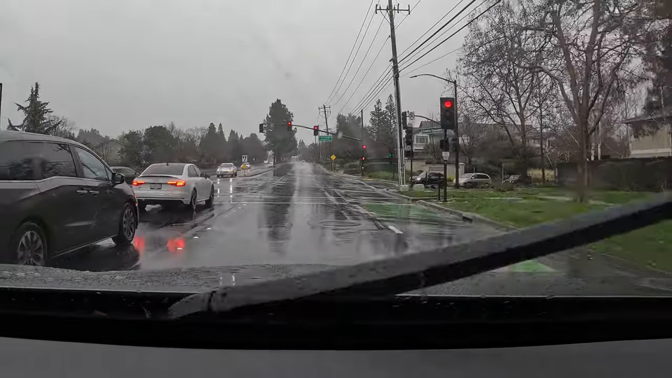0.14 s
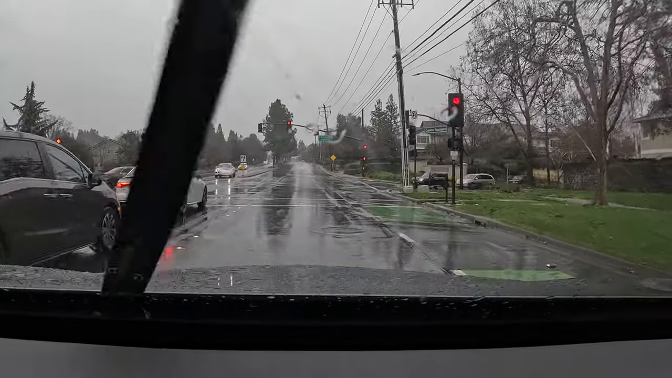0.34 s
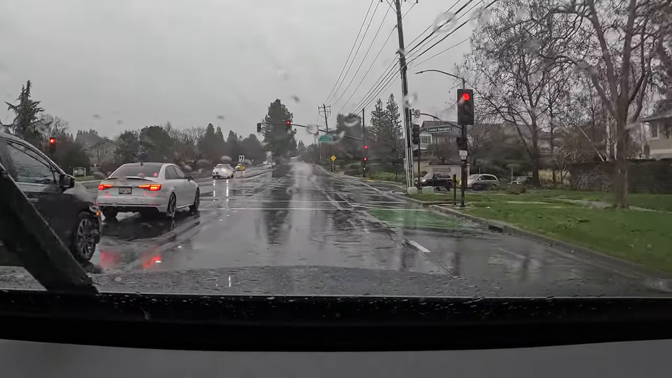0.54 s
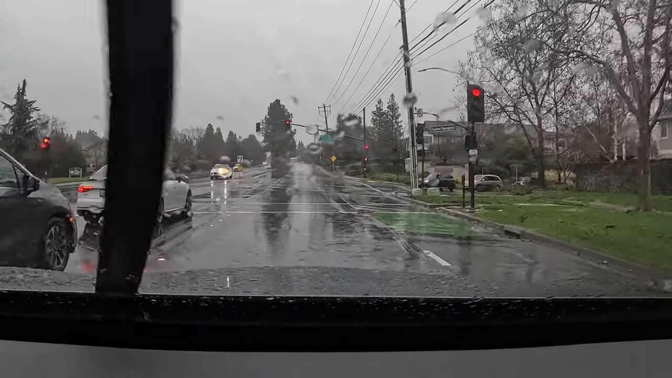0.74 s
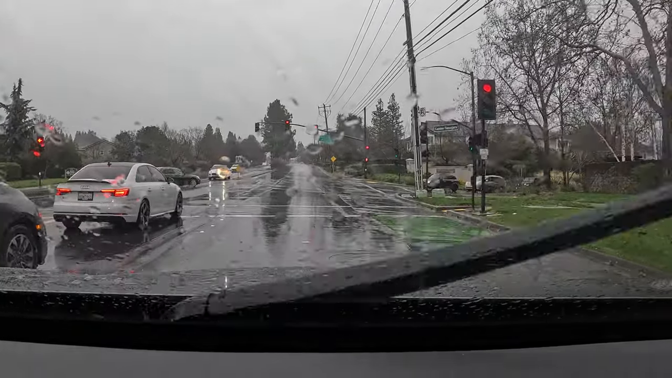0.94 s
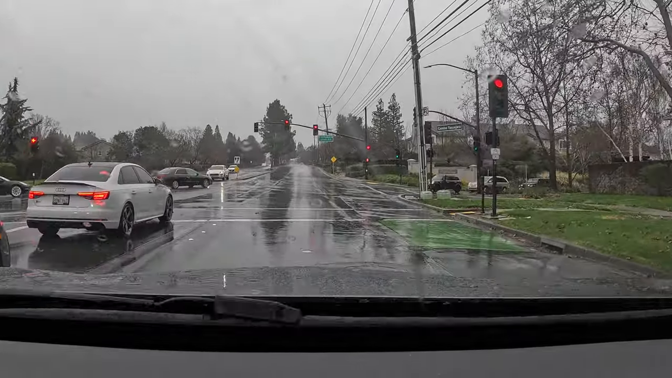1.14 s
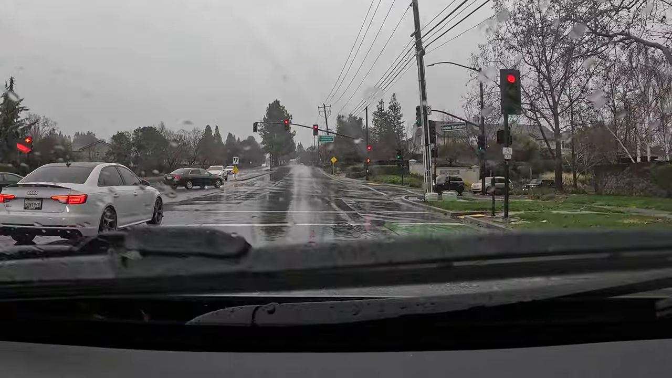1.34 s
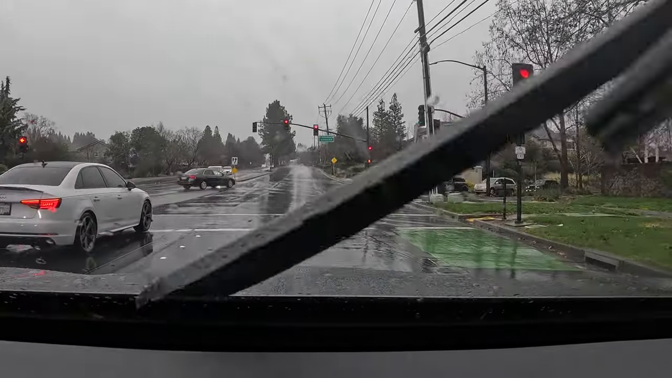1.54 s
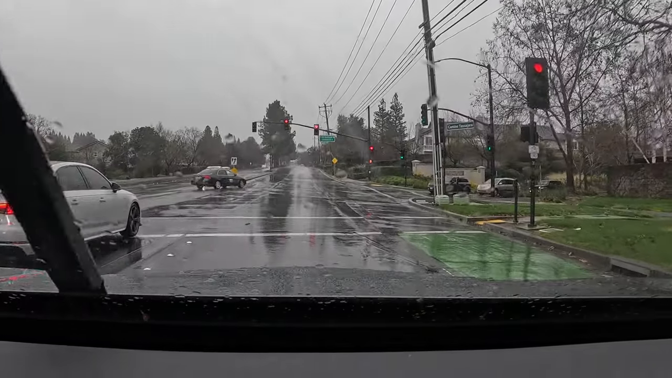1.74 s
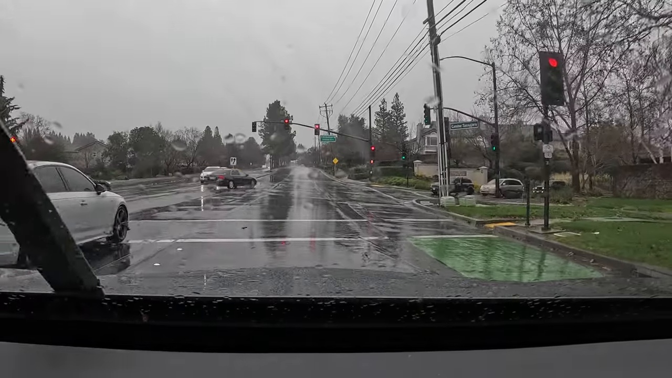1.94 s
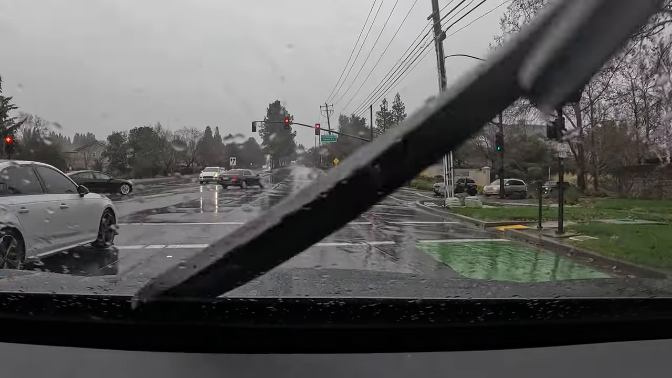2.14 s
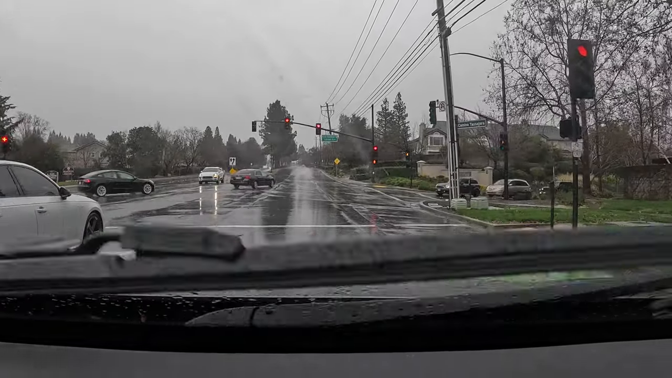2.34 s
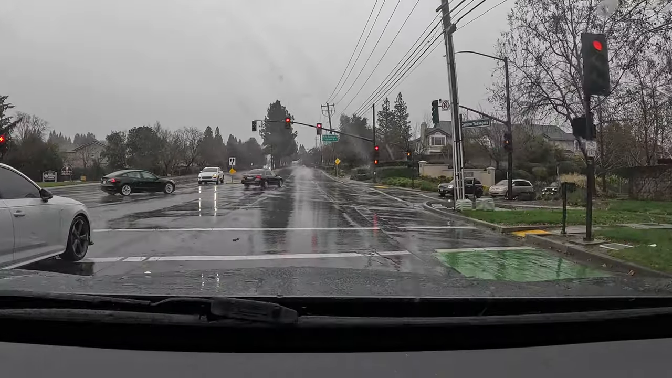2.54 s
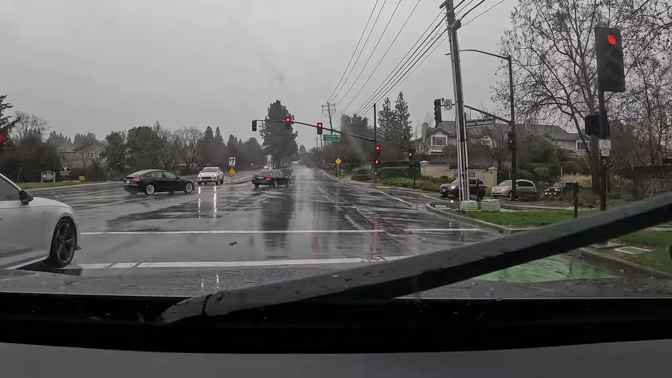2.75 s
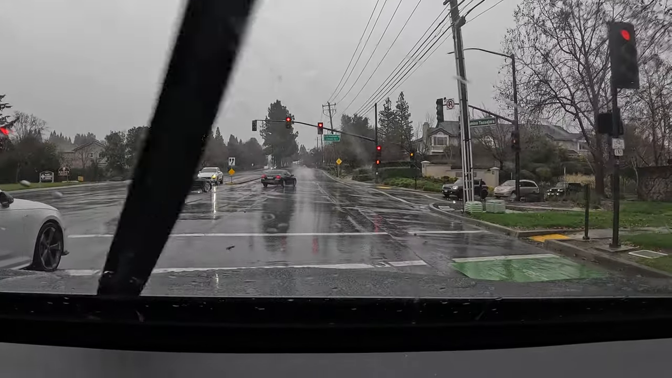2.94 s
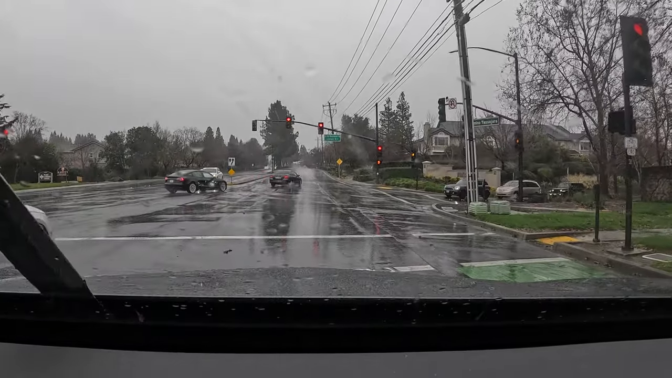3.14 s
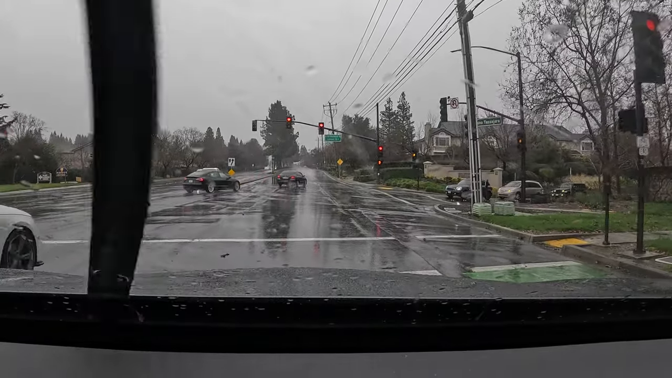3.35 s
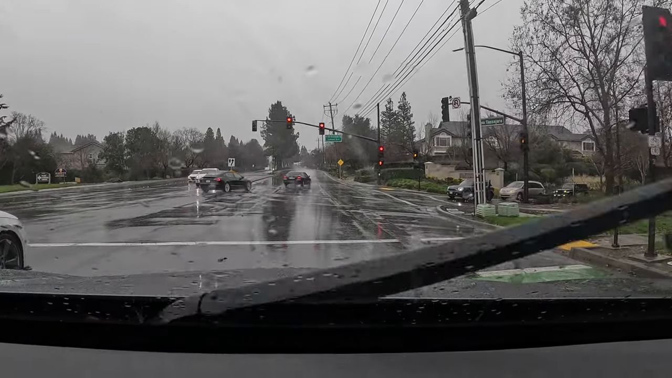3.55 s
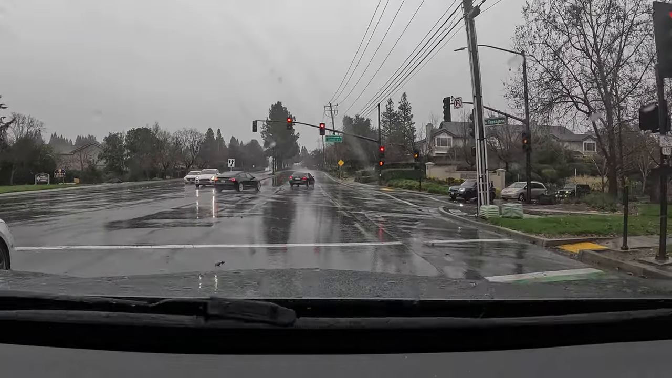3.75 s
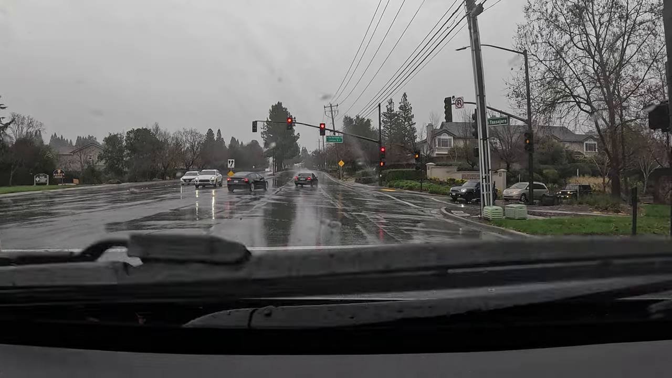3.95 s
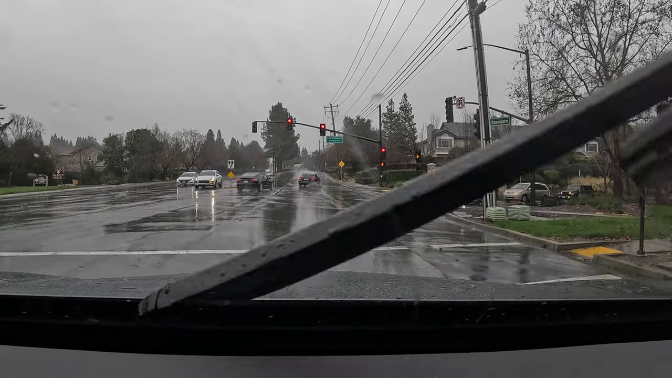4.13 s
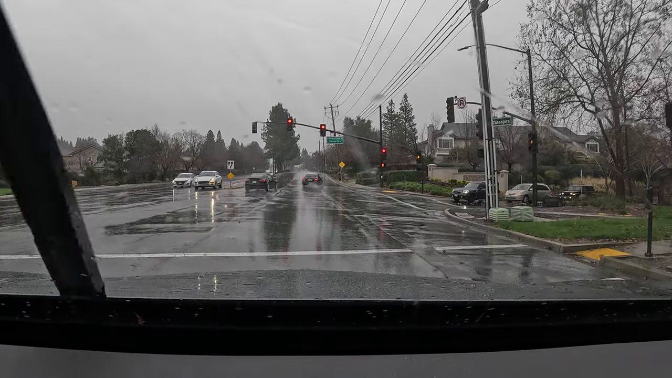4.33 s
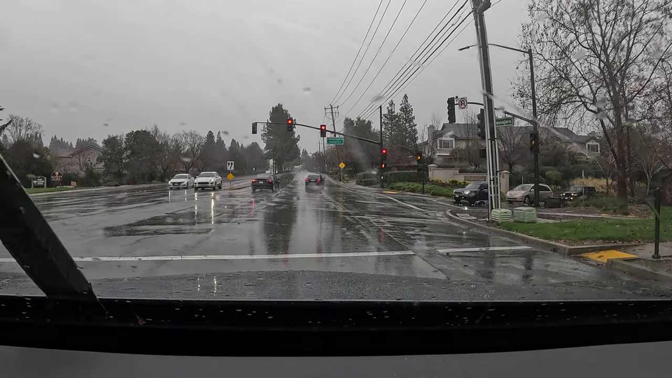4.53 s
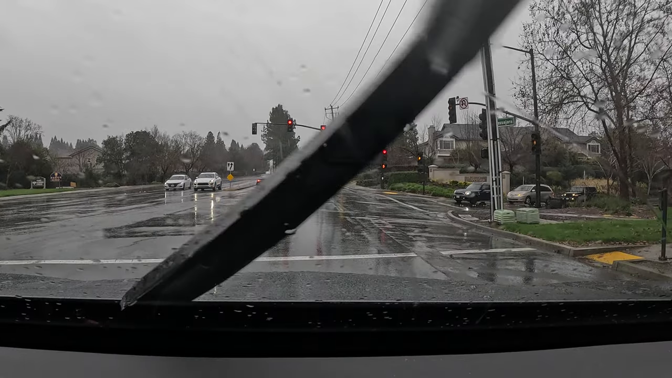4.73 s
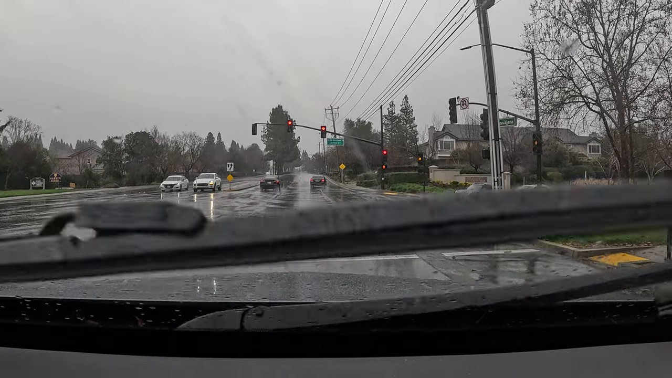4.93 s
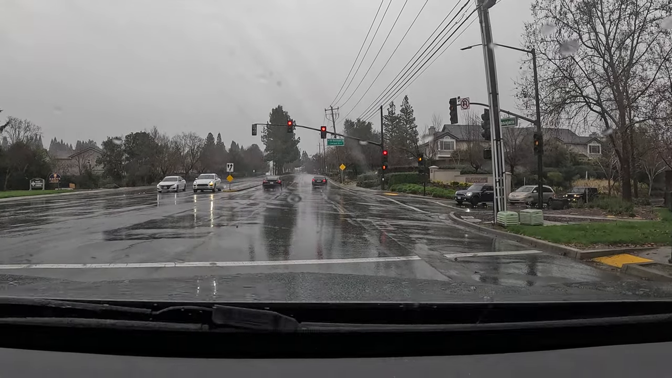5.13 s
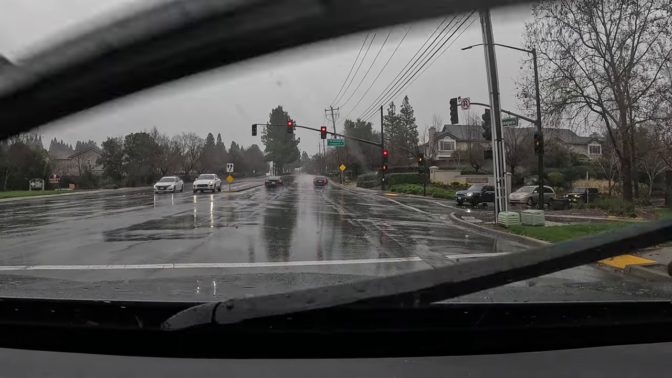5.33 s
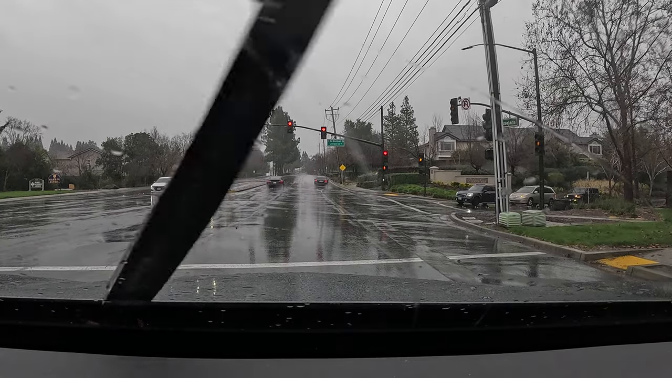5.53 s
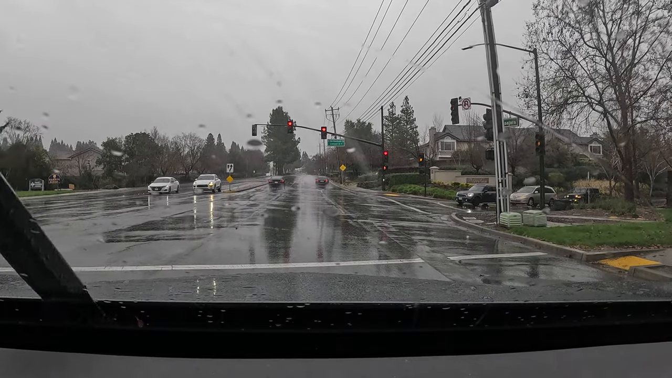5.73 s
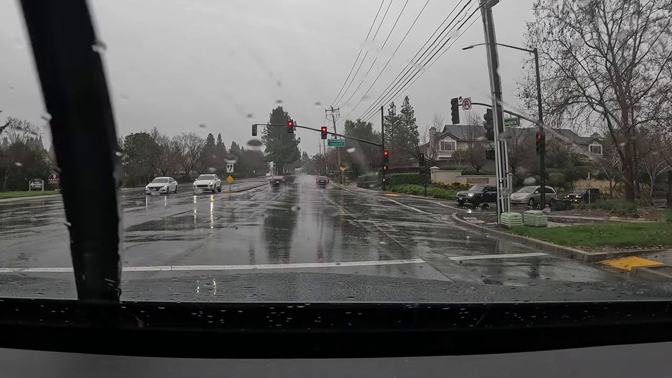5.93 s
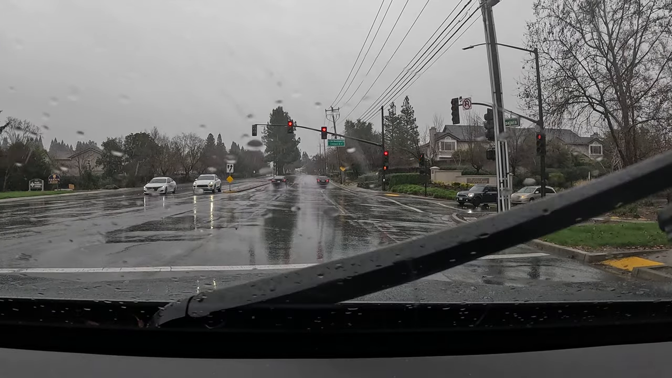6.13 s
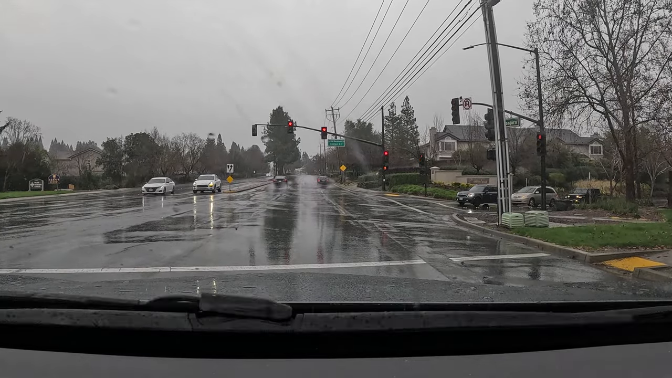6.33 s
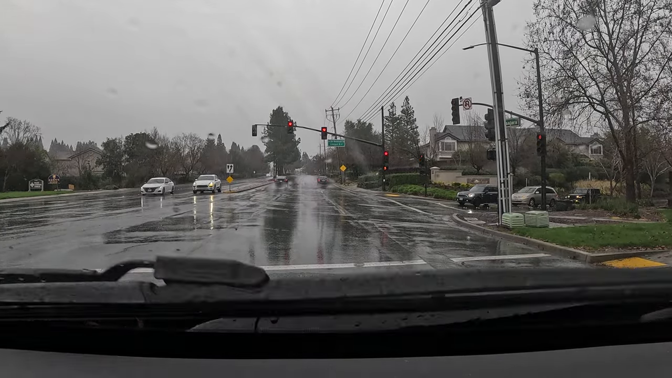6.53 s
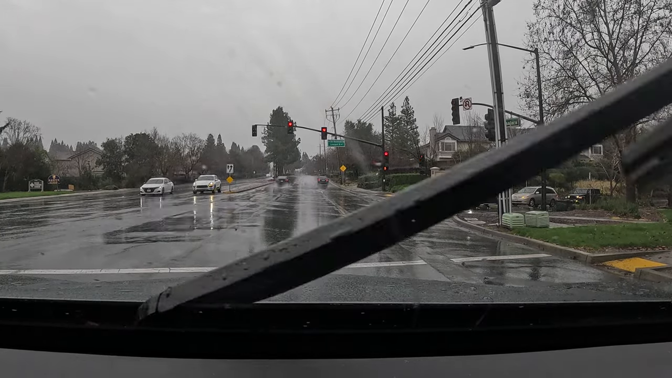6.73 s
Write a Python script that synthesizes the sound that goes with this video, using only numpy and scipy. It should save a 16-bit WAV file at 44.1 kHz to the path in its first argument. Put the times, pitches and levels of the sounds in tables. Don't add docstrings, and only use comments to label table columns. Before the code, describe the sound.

Windshield wipers knock in regular double beats and park with soft thuds, above a deep fading cabin rumble and faint rainy spray.

```python
import sys
import numpy as np
from scipy import signal
from scipy.fft import rfft, irfft
from scipy.io import wavfile
from scipy.ndimage import uniform_filter1d

SR = 44100
rng = np.random.default_rng(int(sys.argv[2]) if len(sys.argv) > 2 else 0)


def file_out(sig):
    cols = np.atleast_2d(sig).T
    lim = np.clip(cols, -1, 1)
    pcm = np.round(lim * 32767).astype(np.int16)
    wavfile.write(sys.argv[1], SR, pcm)


def ratio_of_db(decibels):
    return 10 ** (np.asarray(decibels, float) / 20)


N = 303408

# f/Hz, level/dB, decay time t60/s
CABIN = [(117.2, -6.5, 0.28), (137.54, 0.5, 0.42), (165, -6.5, 0.018)]
# t/s, pat level/dB, pat centre f/Hz, fizz level/dB
DROPS = [(0.243, -49, 3900, -70), (0.258, -56, 4000, -87.5), (0.27, -55, 4015, -80),
         (0.531, -66, 6000, -76), (0.863, -55, 3094, -95.5), (1.0388, -68, 4000, -83),
         (1.123, -67, 6000, -80), (1.594, -49, 2200, -81), (2.57, -52, 2850, -95),
         (2.586, -51.5, 2970, -99), (2.675, -69, 6000, -75), (2.711, -73, 6000, -84),
         (2.7335, -70, 6000, -73), (2.8384, -70, 6000, -74.5), (2.895, -48, 2400, -90),
         (3.019, -58, 4000, -81), (3.0834, -62, 7400, -80), (3.458, -68, 7040, -87.5),
         (3.886, -47, 2600, -92), (4.139, -62, 4030, -85), (4.198, -63, 6000, -84.5),
         (4.201, -53, 2480, -96), (5.182, -52.5, 2780, -92), (5.429, -60, 2980, -87), (5.5, -49, 2560, -82),
         (5.513, -51, 2800, -84), (5.5843, -68, 6900, -94), (6.268, -75, 6220, -99),
         (6.491, -50, 2550, -92), (6.6485, -69, 5040, -88), (6.7182, -74.5, 6000, -79),
         (6.8042, -67, 6500, -87), (6.804, -50, 2480, -95), (6.817, -54, 2530, -94)]
# t/s, spray level/dB, rise/s, fall/s, mist against spray/dB
PASSES = [
    (0.27, -60.5, 0.13, 0.14, -7.5),
    (0.65, -63, 0.12, 0.62, -14),
    (1.22, -56.5, 0.12, 0.18, -13),
    (1.55, -62.5, 0.12, 0.29, -11.5),
    (4.15, -66, 0.35, 0.33, -15),
]
# t/s, strength/dB, brightness/dB, boom/dB
NEAR_FLIPS = [
    (0.576, -3.5, 1.5, 0),
    (1.877, 1.7, 0.2, 1.5),
    (3.179, 2, -0.5, 0),
    (4.482, -0.4, 1.5, 0.3),
    (5.78, 3, -6, -2),
]
FAR_FLIPS = [
    (0.634, -0.28, 2, 3.5),
    (1.946, 1, -2, -8),
    (3.244, -2.9, 4.5, 5.5),
    (4.543, 0.035, 1.5, 2),
    (5.844, -0.49, 1, -1),
]
TURN_BACKS = [
    (0.715, -1, -1.5, 6),
    (2.018, -0.31, -1.3, -1),
    (3.324, -0.49, 0.45, 7),
    (4.62, -0.34, 1.4, 4),
    (5.922, -0.054, 1.8, 6),
]
PARKINGS = [
    (1.271, 1, 3, 3.5),
    (2.584, -0.99, -16, 2.5),
    (3.881, -1.3, -1, -2),
    (5.189, 0.29, 1.5, 3.5),
    (6.483, 1, -1, 1.8),
]


def rms_one(x):
    return x / np.sqrt(np.mean(x ** 2) + 1e-20)


def drift(rate):
    r = np.exp(-80 * np.pi * rate / SR)
    slow = signal.lfilter([1], [1, -2 * r, r * r], rng.standard_normal(N // 40 + 2002))[2000:]
    return np.interp(np.arange(N) / 40, np.arange(len(slow)), rms_one(slow))


def ring(clicks, hz, t60):
    r, w = ratio_of_db(-60 / (t60 * SR)), 2 * np.pi * hz / SR
    return signal.lfilter([0, np.sin(w)], [1, -2 * r * np.cos(w), r * r], clicks + 1e-18)


def band_pass(x, low_hz, high_hz, order=2):
    return signal.sosfilt(signal.butter(order, [low_hz, high_hz], "band", fs=SR, output="sos"), x)


def swells(times, levels_db, rise_s, fall_s):
    columns = np.broadcast_arrays(times, levels_db, rise_s, fall_s)
    times, levels_db, rise_s, fall_s = (v[:, None] for v in columns)
    t = np.arange(0, N, 40) / SR - times
    bells = np.exp(-(t / np.where(t < 0, rise_s, fall_s)) ** 2)
    power = np.sum(ratio_of_db(2 * levels_db) * bells, axis=0)
    return np.interp(np.arange(N) / 40, np.arange(len(power)), power)


def bursts(times, levels_db, centres_hz, spread, rise_s, fall_s):
    out, t = np.zeros(N + SR), np.arange(SR // 20) / SR
    noise = rng.standard_normal((len(times), len(t)))
    shape = (1 - np.exp(-t / rise_s)) * np.exp(-t / fall_s)
    for s, db, hz, puff in zip(times, levels_db, centres_hz, noise):
        burst = band_pass(puff * shape, hz / spread, hz * spread, order=4)
        out[int(s * SR):][:len(t)] += ratio_of_db(db) * burst / np.abs(burst).max()
    return out[:N]


def struck(times, levels_db, modes, chatter_s, spread_db, gain_db, first_db, one_way, kinds):
    bounce = rng.random((len(times), 24))[kinds] ** 1.6 * (np.arange(24) > 0)
    at = ((times[:, None] + chatter_s * bounce) * SR).astype(int)
    strength_db = levels_db[:, None] + gain_db - 8.2 * bounce + first_db * (bounce == 0)
    pushed = (bounce == 0) | one_way
    out = np.zeros(N)
    for hz, mode_db, t60 in modes:
        chance = rng.standard_normal(at.shape + (2,))[kinds]
        height = ratio_of_db(strength_db + mode_db + spread_db * chance[..., 0])
        sign = np.sign(chance[..., 1] - 9 * pushed)
        clicks = np.zeros(N)
        np.add.at(clicks, at, height * sign)
        out += ring(clicks, hz, t60 * 0.94)
    return band_pass(out, modes[0][0] * 0.8, modes[-1][0] * 1.21)


def wipers():
    # delay/s, knock level/dB, glass level/dB, rattle level/dB
    near_flip = [
        (0.0, -27, -38, -43),
        (0.011, -27, -36, -43),
        (0.022, -22, -35, -43),
        (0.033, -28, -39, -45),
        (0.050, -27, -43, -54),
    ]
    far_flip = [
        (0.0, -24.5, -35, -42),
        (0.012, -28.5, -46, -53),
    ]
    turn_back = [
        (0.0, -37, -46, -53.5),
        (0.015, -28.5, -45, -48),
        (0.028, -42, -46.5, -55),
    ]
    parking = [
        (0.0, -36, -47, -58.5),
        (0.028, -34, -51, -62.5),
        (0.050, -35.5, -48, -66.5),
        (0.068, -34, -48.5, -58.5),
    ]
    boom_levels = [
        (-16.5, -34.5, -36, -34.5, -25),
        (-28, -29),
        (-25, -35, -34),
        (-26, -28, -27, -16.5),
    ]
    # f/Hz, level/dB, decay time t60/s
    dash_modes = [(187.7, -3.5, 0.11), (230.3, 4, 0.096), (264, 0.5, 0.1), (314, -3, 0.1),
                  (410, -3.5, 0.03)]
    # f/Hz, level/dB, decay time t60/s
    glass_modes = [(417, -2.5, 0.035), (497, -3.5, 0.032), (625, 2, 0.098), (770, -10, 0.08),
                   (784, 0, 0.09), (905, -14.5, 0.052)]
    # f/Hz, level/dB, decay time t60/s
    linkage_modes = [(946, 2, 0.041), (1195, 1.5, 0.058), (1177, -9.5, 0.15), (1353, 4, 0.03),
                     (1570, -4, 0.019), (1620, -9.5, 0.011), (1850, -4, 0.013), (2100, -7, 0.0092),
                     (2440, -12.5, 0.018), (2633, -10, 0.044), (2970, -16, 0.022), (3400, -9.5, 0.015)]
    starts_of_stages = [NEAR_FLIPS, FAR_FLIPS, TURN_BACKS, PARKINGS]
    stages = list(zip(starts_of_stages, [near_flip, far_flip, turn_back, parking], boom_levels))
    rows, each_contact = [], []
    for starts, contacts, booms in stages:
        for start, hard, bright, deep in starts:
            for contact, boom_db in zip(contacts, booms):
                delay, knock_db, glass_db, rattle_db = contact
                each_contact.append(contact)
                rows.append((start + delay, boom_db + hard + deep, knock_db + hard,
                             glass_db + hard + bright / 2, rattle_db + hard + bright))
    s, boom_db, knock_db, glass_db, rattle_db = np.transpose(rows)
    each = np.arange(len(s))
    alike = np.unique(each_contact, axis=0, return_inverse=True)[1].ravel()
    boom = struck(s, boom_db, CABIN, chatter_s=0.004, spread_db=3.5, gain_db=-28.0,
                  first_db=6.5, one_way=True, kinds=alike)
    knock = struck(s, knock_db, dash_modes, chatter_s=0.012, spread_db=3.0, gain_db=-13.0,
                   first_db=4.0, one_way=False, kinds=alike)
    glass = struck(s, glass_db, glass_modes, chatter_s=0.021, spread_db=5.0, gain_db=-16.5,
                   first_db=4.5, one_way=False, kinds=each)
    rattle = struck(s, rattle_db, linkage_modes, chatter_s=0.024, spread_db=4.0, gain_db=-16.5,
                    first_db=-1.5, one_way=False, kinds=each)
    return boom + knock + glass + rattle


def lip_slaps():
    # t/s, level/dB, centre f/Hz
    slaps = [(0.52, -40.5, 940), (0.636, -43, 1100), (1.878, -37, 860), (1.945, -43.5, 980),
             (3.186, -42, 780), (3.5, -42, 1060), (4.9, -37, 850), (4.542, -37.5, 770), (5.781, -40, 750),
             (5.844, -41, 1080), (5.938, -44.5, 1240), (4.637, -48, 1150), (3.1, -44, 1300),
             (1.6, -45.5, 880), (6.493, -48, 900), (0.592, -39.5, 920), (1.897, -38, 860),
             (3.202, -39, 870), (4.494, -39, 1100), (5.794, -38, 860)]
    return bursts(*np.transpose(slaps), spread=1.92, rise_s=0.001, fall_s=0.011)


def joint_clicks():
    # t/s, level/dB, centre f/Hz
    joints = [(0.578, -59, 5200), (0.600, -59, 5300), (0.636, -53, 5300), (1.878, -57.5, 5500),
              (1.893, -58, 5300), (1.908, -68, 8800), (1.945, -60, 5400), (1.953, -61, 5000),
              (3.180, -64.5, 4800), (3.202, -57, 5300), (3.210, -56, 5800), (3.210, -66, 9200),
              (3.244, -51.5, 5400), (3.244, -64, 9200), (3.345, -62.5, 4800), (4.482, -61, 5200),
              (4.502, -58, 5300), (4.541, -54, 5300), (4.546, -71, 9200), (5.782, -65, 5000),
              (5.804, -65, 5300), (5.844, -63, 5400), (5.846, -68, 9200), (5.938, -62, 5000)]
    return bursts(*np.transpose(joints), spread=1.1, rise_s=0.00054, fall_s=0.0022)


def thump():
    # t/s, push level/dB
    pushes = [
        (0.744, -9),
        (2.0485, -8),
        (3.349, -13),
        (4.651, -9.5),
        (5.9533, -10),
    ]
    # lead/s, level against the push/dB, signed direction
    rocking = [
        (0.0085, -9.5, -0.62),
        (0.018, -7, 0.94),
        (0.028, -9.5, -1),
    ]
    s, push_db = np.transpose(pushes)
    t = np.arange(-SR // 100, SR // 100) / SR
    shape = -np.exp(-(t / 0.0011) ** 2)
    push, kick = np.zeros((2, N))
    push[(s * SR).astype(int)] = ratio_of_db(push_db)
    for lead_s, db, way in rocking:
        push[((s - lead_s) * SR).astype(int)] = way * ratio_of_db(push_db + db)
    kick[((s + 0.002) * SR).astype(int)] = ratio_of_db(push_db - 14.5)
    swing = sum(ratio_of_db(db) * ring(kick, hz, t60) for hz, db, t60 in CABIN)
    swing = np.convolve(swing, shape / shape.sum(), "same")
    leak = signal.butter(1, 35, "high", fs=SR, output="sos")
    return signal.sosfilt(leak, np.convolve(push, shape, "same")) + swing


def drag():
    peak_delays = [
        0.022,
        0.012,
        0.025,
        0.05,
    ]
    # level/dB, rise/s, fall/s
    stage_drags = [
        (-1.1, 0.023, 0.061),
        (-1, 0.0045, 0.018),
        (-4, 0.048, 0.037),
        (-10, 0.058, 0.056),
    ]
    rows = []
    for starts, peak, (db, rise, fall) in zip([NEAR_FLIPS, FAR_FLIPS, TURN_BACKS, PARKINGS],
                                              peak_delays, stage_drags):
        rows += [(s + peak, hard + db, rise, fall) for s, hard, *_ in starts]
    return swells(*np.transpose(rows))


def scrape(rub):
    slips = rng.standard_normal(N) * ratio_of_db(9.0 * drift(60))
    return ratio_of_db(-55.5) * np.sqrt(rub) * rms_one(band_pass(slips, 460, 1450))


def drops():
    s, pat_db, pat_hz, fizz_db = np.transpose(DROPS)
    pats = bursts(s, pat_db, pat_hz, spread=1.3, rise_s=0.0013, fall_s=0.0045)
    fizz = bursts(s, fizz_db + 6.5, 10500 + 0 * s, spread=1.6, rise_s=0.004, fall_s=0.005)
    return pats + fizz


def coloured(spectrum, patchy_db, rate):
    points, hz = np.array(spectrum), np.maximum(np.fft.rfftfreq(N, 1 / SR), 1)
    curve_db = np.interp(np.log(hz), np.log(points[:, 0]), points[:, 1], -120, -120)
    shaped = rfft(rng.standard_normal(N)) * ratio_of_db(curve_db)
    out, together = 0, drift(rate / 2)
    for centre in range(3, 15):
        share = np.clip(1 - np.abs(np.log2(hz) - centre), 0, 1)
        if points[0, 0] / 2 < 2 ** centre < points[-1, 0] * 2:
            flicker_db = patchy_db * (0.55 * together + drift(rate))
            out = out + irfft(shaped * share, N) * ratio_of_db(flicker_db)
    return rms_one(out)


def evened(x, span_s):
    return rms_one(x / np.sqrt(uniform_filter1d(x ** 2, int(span_s * SR)) + 0.21))


def loudness(mean_db, follows, speed_db, extra):
    return np.sqrt(ratio_of_db(2 * (mean_db + follows * speed_db)) + extra)


def body_rumble(speed_db):
    # f/Hz, level/dB per Hz
    rumble_spectrum = [(7.1, -32), (12, -11), (38, 6), (75, -9.5), (110, -10), (140, -18.5), (240, -120)]
    # t/s, level/dB
    seams = [(0.1, -28.5), (0.4, -27.5), (0.96, -25), (1.11, -24), (1.4, -31), (1.59, -24), (1.68, -33),
             (1.91, -20), (2.12, -21.5), (2.27, -28.5), (2.429, -27.5), (2.55, -25), (2.76, -27),
             (2.89, -21.5), (3.072, -23), (3.35, -26.5), (3.47, -25.5), (4.06, -23.5), (4.23, -31.5),
             (4.37, -41), (4.54, -27.5), (4.7, -29.5), (4.81, -29.5), (5.27, -35), (5.42, -32.5),
             (5.52, -31.5), (5.6, -29), (5.92, -32)]
    heaves = swells(*np.transpose(seams), rise_s=0.024, fall_s=0.03)
    noise = evened(coloured(rumble_spectrum, patchy_db=2.0, rate=16.0), span_s=0.045)
    return loudness(-32.5, 0.77, speed_db, heaves) * noise


def cabin_drone(speed_db, rub):
    # f/Hz, level/dB per Hz
    drone_spectrum = [(47, -24), (80, -3), (151, -5), (200, -7), (226, -12.5), (308, -13.5), (392, -22.5),
                      (461, -21), (513, -27), (603, -23.5), (663, -28.5), (800, -27), (954, -35.5),
                      (1490, -39), (2000, -52.5), (2600, -79.5), (4400, -120)]
    noise = coloured(drone_spectrum, patchy_db=1.4, rate=11)
    return loudness(-35.0, 0.2, speed_db, ratio_of_db(2 * -28.5) * rub) * noise


def tyre_spray(speed_db, rub):
    # f/Hz, level/dB per Hz
    spray_spectrum = [(900, -20.5), (1500, -7.5), (1870, -9.5), (2380, -8), (3000, -6), (3600, -11.5),
                      (4600, -20.5), (6000, -32.5), (9000, -39.5)]
    s, pass_db, rise_s, fall_s, _ = np.transpose(PASSES)
    extra = swells(s, pass_db, rise_s, fall_s) + ratio_of_db(2 * -62) * rub
    return loudness(-62.5, 0.18, speed_db, extra) * coloured(spray_spectrum, patchy_db=0.68, rate=7.5)


def mist(speed_db, rub):
    # f/Hz, level/dB per Hz
    mist_spectrum = [(3000, -12), (4200, 3), (5200, 3.5), (6300, -0.5), (8000, -7), (10000, -7.5),
                     (11500, -19.5), (13500, -18.5), (16000, -31)]
    s, pass_db, rise_s, fall_s, mist_db = np.transpose(PASSES)
    drop_s, *_, fizz_db = np.transpose(DROPS)
    fine = swells(s, pass_db + mist_db, rise_s, fall_s)
    spreading = swells(drop_s, fizz_db - 2, 0.015, 0.03)
    extra = fine + spreading + ratio_of_db(2 * -79) * rub
    return loudness(-80, 0.84, speed_db, extra) * coloured(mist_spectrum, patchy_db=1.0, rate=14)


def hum(speed_db):
    # f/Hz, level/dB per Hz
    hum_spectrum = [(110, -25.5), (150, -5), (178, -1), (205, 2.5), (250, -28)]
    # t/s, level/dB, rise/s, fall/s
    motor_groans = [
        (1.25, -35.5, 0.12, 0.1),
        (2.62, -47, 0.06, 0.051),
        (3.92, -41, 0.06, 0.06),
        (5.27, -36, 0.083, 0.086),
        (6.52, -44, 0.06, 0.06),
    ]
    labour = swells(np.transpose(TURN_BACKS)[0] + 0.074, -41, rise_s=0.037, fall_s=0.25)
    motor = labour + swells(*np.transpose(motor_groans))
    return loudness(-55, 2.17, speed_db, motor) * coloured(hum_spectrum, patchy_db=2.04, rate=8.3)


def idle():
    # f/Hz, bandwidth/Hz, level/dB
    shake = [(32.26, 2, -42)]
    return sum(ratio_of_db(db) * rms_one(ring(rng.standard_normal(N), hz, 5.7 / width)) for hz, width, db in shake)


def brake_squeal():
    tone = rms_one(ring(rng.standard_normal(N), hz=8900, t60=0.02))
    return np.sqrt(swells([0.25], -86, rise_s=0.1, fall_s=0.13)) * tone


def scene():
    # t/s, road level against the mean/dB
    speed_levels = [
        (0.0, 1.5),
        (0.5, 8.5),
        (1.5, 4.5),
        (2.9, 2),
        (3.6, 2),
        (4.6, -1.5),
        (5.7, 0),
        (6.2, -4),
        (6.88, -0.5),
    ]
    speed_db = np.interp(np.arange(N) / SR, *np.transpose(speed_levels))
    rub = drag()
    blades = wipers() + lip_slaps() + joint_clicks() + thump() + scrape(rub)
    water = drops() + tyre_spray(speed_db, rub) + mist(speed_db, rub)
    road = body_rumble(speed_db) + cabin_drone(speed_db, rub) + hum(speed_db)
    return (blades + water + road + idle() + brake_squeal())[None]


def top_cut(x):
    return signal.sosfilt(signal.butter(12, 15800, fs=SR, output="sos"), x)


def record(dry):
    mix = 0.45 * np.tanh(dry / 0.45)
    return top_cut(mix)


dry = scene()
out = record(dry)
file_out(out)
```